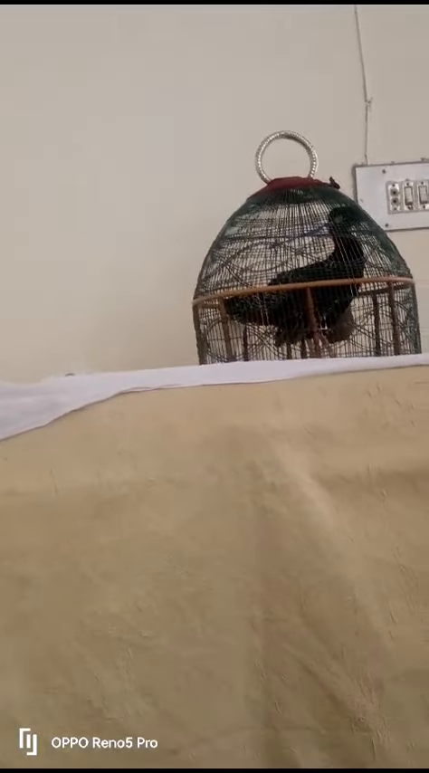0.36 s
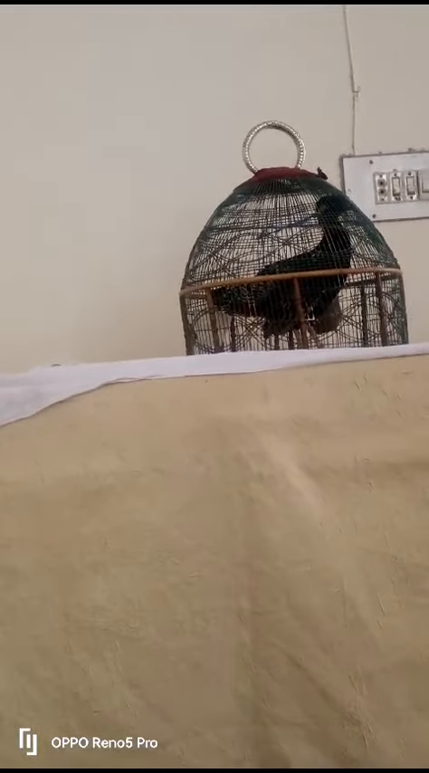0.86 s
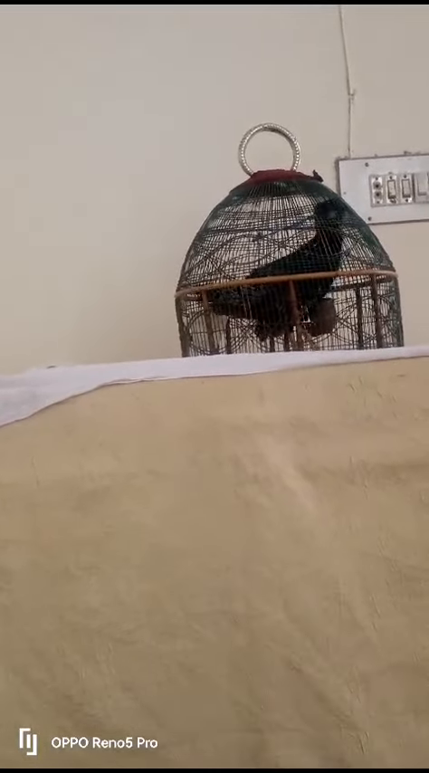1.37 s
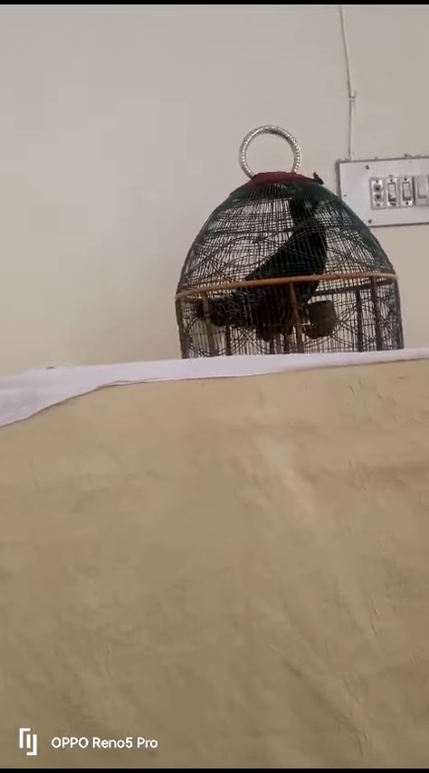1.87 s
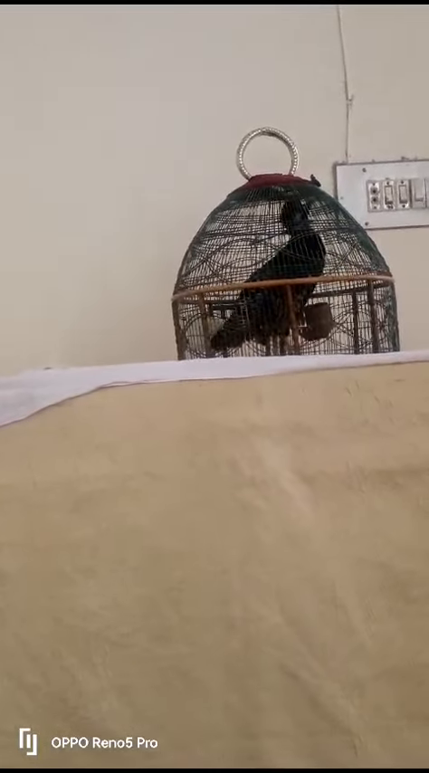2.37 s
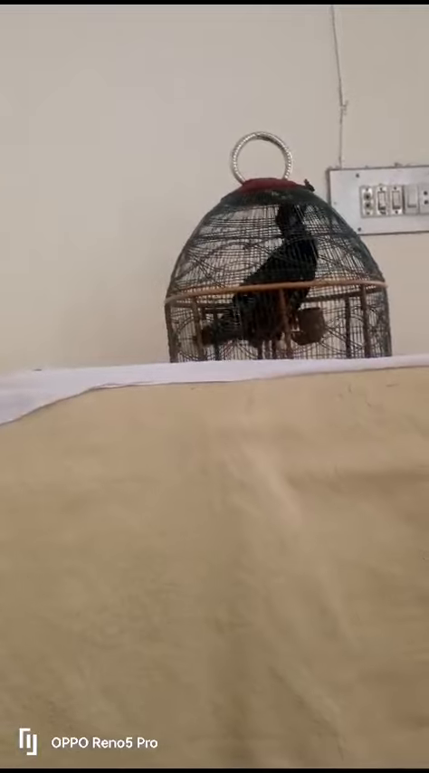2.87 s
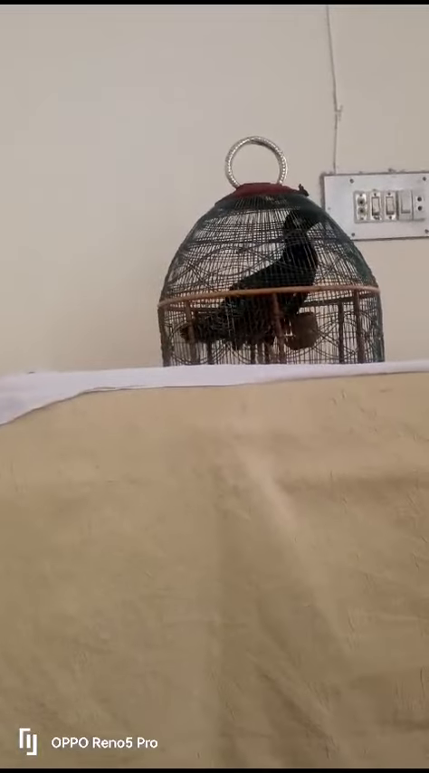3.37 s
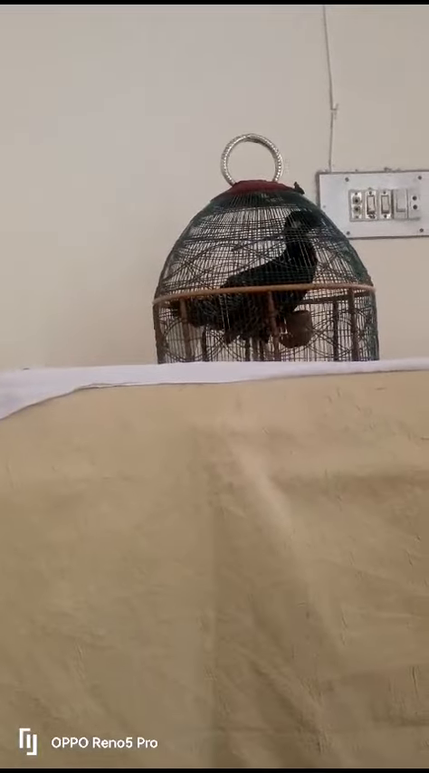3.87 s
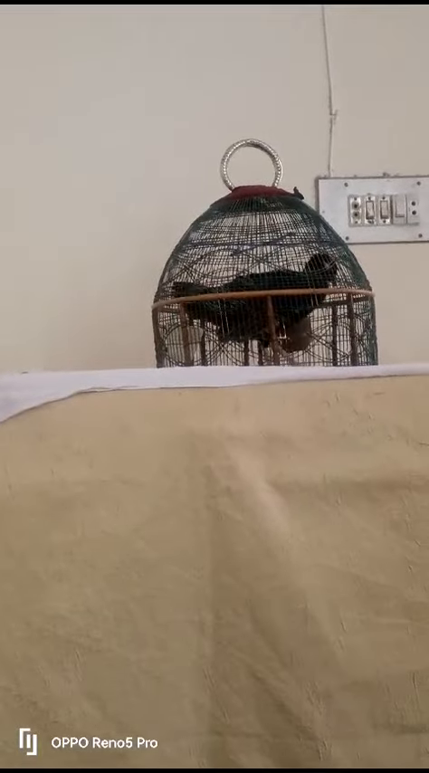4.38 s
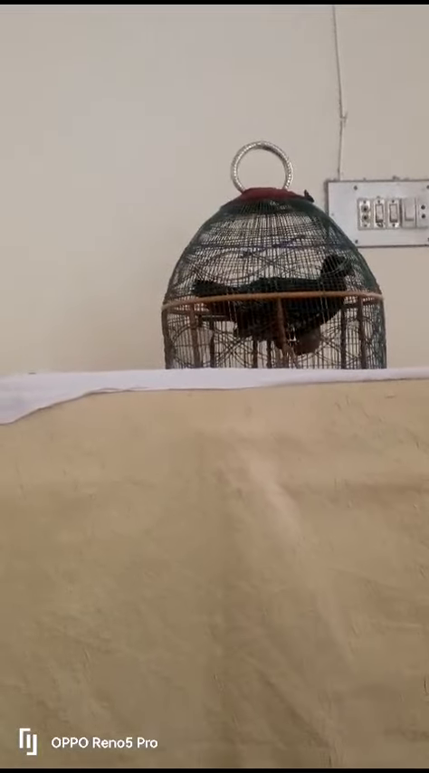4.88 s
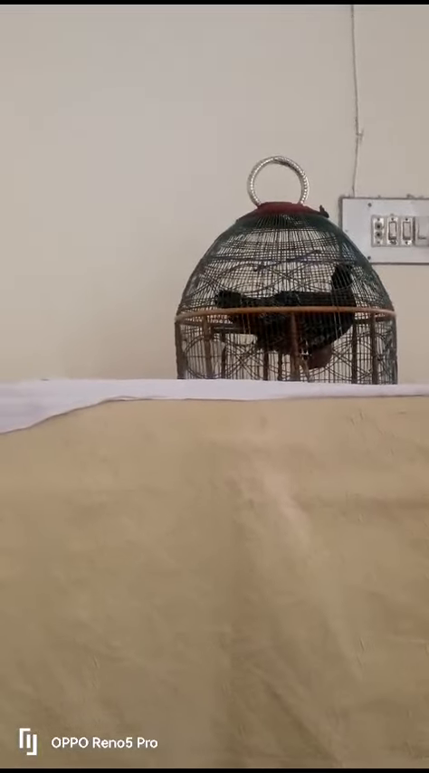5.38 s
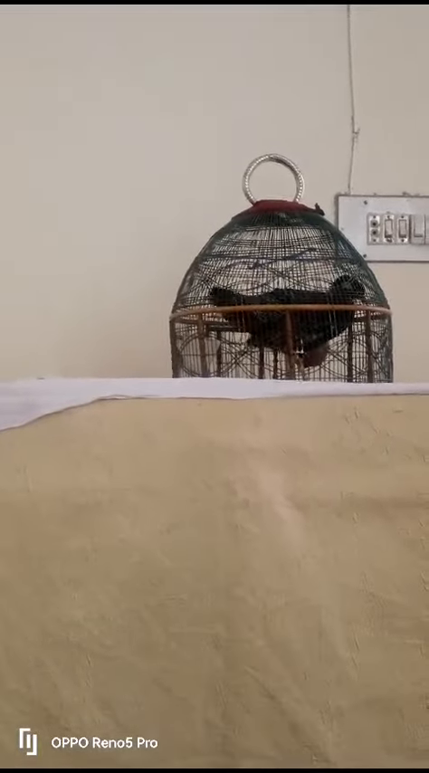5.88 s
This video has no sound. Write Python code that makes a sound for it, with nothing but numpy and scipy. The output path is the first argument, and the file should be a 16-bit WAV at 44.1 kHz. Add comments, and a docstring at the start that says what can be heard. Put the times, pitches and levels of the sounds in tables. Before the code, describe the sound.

A caged game bird gives five harsh, raspy, piercing calls in a bare room while a ceiling fan hums, ticks and squeaks.

```python
"""A ceiling fan hums and rustles in a bare room, ticks and squeaks; then a caged game bird gives five harsh calls.
Air and draught are shaped noise; ticks are dying noise bursts and squeaks are sagging rough tones.
The bird is a source-filter voice: uneven pulses and breath excite moving resonances.
A phone hears it with two unlike microphones: a dull left one and a shrill right one that overloads."""
import sys
import numpy as np
from scipy import signal
from scipy.fft import rfft, irfft, next_fast_len
from scipy.io import wavfile
from scipy.ndimage import uniform_filter1d, minimum_filter1d

SR = 44100
rng = np.random.default_rng(int(sys.argv[2]) if len(sys.argv) > 2 else 0)


def int16_out(signal):
    """Quantize to a 16-bit WAV file."""
    q = np.round(np.clip(np.atleast_2d(signal).T, -1, 1) * 32767)
    wavfile.write(sys.argv[1], SR, q.astype(np.int16))


def attenuation_scalar(level_db):
    """Turn a level in dB into a linear amplitude multiplier (20 dB per decade)."""
    decades = np.asarray(level_db, float) / 20
    return 10 ** decades


N = 265030
RIGHT_LAG = 14   # samples by which sound reaches the right microphone later


def times():
    """Sampling: the instant of every sample in seconds."""
    return np.arange(N) / SR


def rms_one(x):
    """Normalisation: equal mean power, here an rms of 1 over all channels."""
    return x / np.sqrt(np.mean(x ** 2) + 1e-20)


def at_bins(points, size):
    """Interpolation on a logarithmic frequency axis: a (Hz, value) table read at every FFT bin."""
    hz, value = np.transpose(points)
    bin_hz = np.arange(size // 2 + 1) * SR / size
    return np.interp(np.log(bin_hz + 1), np.log(hz), value)


def colour(x, points):
    """Linear filtering: each frequency is scaled by a (Hz, dB) table, its phase left alone."""
    size = next_fast_len(N)
    spectrum = rfft(x, size) * attenuation_scalar(at_bins(points, size))
    return irfft(spectrum, size)[..., :N]


def drift(rate_hz, channels=1):
    """Low-passed random fluctuation: white noise through two equal poles, rms 1."""
    pole = np.exp(-2 * np.pi * rate_hz / SR)
    noise = rng.standard_normal((channels, N + SR))
    slow = signal.lfilter([1], [1, -2 * pole, pole * pole], noise)
    return rms_one(slow[:, SR:])   # the first second lets the filter settle


def resonate(x, hz, width_hz):
    """Heterodyne resonance: shift a movable centre to 0 Hz, low-pass twice, shift back; rms 1."""
    turn = np.exp(2j * np.pi * np.cumsum(hz + np.zeros(N)) / SR)
    pole = np.exp(-np.pi * width_hz / SR)
    envelope = signal.lfilter([1], [1, -2 * pole, pole * pole], x / turn)
    return rms_one(np.real(turn * envelope))


def fan_air():
    """Turbulence noise and motor hum throbbing once a turn; the two ears' coherence falls with frequency."""
    # Air moved by the blades. Each row: frequency in Hz, density in dB per Hz before slow fluctuation.
    air_spectrum = [(25, -71), (90, -67), (250, -69), (520, -72), (1000, -74.5), (1350, -82.5), (2200, -86),
                    (4000, -84.5), (8000, -106.5), (16000, -100)]
    # Motor hum bands. Each row: centre in Hz, width in Hz, level in dB before the throb,
    # throb depth in dB either way, time of a throb peak in seconds.
    hum_bands = [(150.3, 57, -49, 6.5, 0.08), (412, 64, -52.5, 3, 0.11)]
    # Likeness of the two ears. Each row: frequency in Hz, correlation from 0 to 1.
    ear_likeness = [(60, 0.86), (240, 1), (950, 0.44), (3770, 0.01), (15000, 0.03)]
    turns_per_s = 4.5
    size = next_fast_len(N)
    alike = np.clip(at_bins(ear_likeness, size), -1, 1)
    mid, side = rfft(rng.standard_normal((2, size)))
    shared = np.sqrt((1 + alike) / 2) * mid
    opposed = np.sqrt((1 - alike) / 2) * side * [[1], [-1]]
    white = irfft(shared + opposed, size)[:, :N]
    out = colour(white, air_spectrum) * np.sqrt(SR / 2) * attenuation_scalar(1.2 * drift(6.4))
    for hz, width_hz, hum_db, throb_db, peak_s in hum_bands:
        throb = throb_db * np.cos(2 * np.pi * turns_per_s * (times() - peak_s))
        out += attenuation_scalar(hum_db + throb) * resonate(white, hz, width_hz)
    return out


def draught():
    """Flow noise at the ports: lumpy rumble in gusts, partly its own at each port, stronger on the right."""
    # Gusts on the microphone ports. Each row: time of the peak in seconds,
    # level in dB before the port offsets, slope up and down in dB per second.
    port_gusts = [(.5, -47, 64), (.95, -50, 88), (1.27, -39, 111), (1.68, -40.5, 92), (2.13, -48.5, 85),
                  (2.73, -36, 82), (3.25, -28, 91), (4.8, -40.5, 49), (5.52, -40, 106)]
    calm_db = -61   # before the port offsets
    noise = rng.standard_normal((2, N)) + 1.64 * rng.standard_normal(N)   # own + common
    rumble = rms_one(colour(noise, [(12, -25), (28, 1), (70, -10.0), (160, -19.0), (500, -18),
                                    (1300, -31.0), (16000, -120)]))
    strength = attenuation_scalar(calm_db)
    for s, peak_db, slope in port_gusts:
        strength = strength + attenuation_scalar(peak_db - slope * np.abs(times() - s))
    port_db = [[-2.0], [2.5]]   # left, right
    return rumble * strength * attenuation_scalar(2.1 * drift(6.7, channels=2) + port_db)


def fan_ticks():
    """Impact excitation: loose parts rattle in short bright noise bursts that decay exponentially."""
    # Loud ticks. Each row: time in seconds, strength in dB before smearing and colouring.
    loud_ticks = [(0.2049, -49), (0.3466, -49), (0.511, -52), (0.7552, -51), (0.9253, -44.5), (1.1687, -54),
                  (1.2216, -49), (3.7962, -48.5), (3.9987, -47), (4.1843, -50), (4.313, -47), (4.509, -44),
                  (4.7086, -45.5), (4.7984, -51), (5.0933, -44.5), (5.1911, -46), (5.3102, -45.5),
                  (5.49, -50), (5.6634, -53), (5.9637, -53)]
    # faint ticks at random: rate, then median and spread of strength before smearing and colouring
    faint_per_s, faint_db, faint_spread_db = 3, -57, 3
    struck = rng.random(N) < faint_per_s / SR
    knocks = struck * attenuation_scalar(faint_db + faint_spread_db * rng.standard_normal(N))
    for s, tick_db in loud_ticks:
        knocks[round(s * SR)] = attenuation_scalar(tick_db)
    decay_s = 0.012
    shape = signal.lfilter([1], [1, -np.exp(-1 / (decay_s * SR))], knocks + 1e-18)
    shape = uniform_filter1d(shape, size=260)   # a few parts strike within 6 ms
    noise = rng.standard_normal(N)
    return shape * colour(noise, [(1500, -30.0), (3000, 9.5), (6000, 4.5), (16000, -15)])


def fan_squeaks():
    """Frictional oscillation: a dry bearing sings briefly in phase-roughened tones that sag in pitch."""
    # Squeaks. Each row: start in seconds, peak level in dB at the source, starting pitch in Hz,
    # time to the final fade in seconds.
    bearing_squeaks = [(0.94, -49, 3500, 0.037), (1.41, -53.5, 5790, 0.016), (4.503, -51, 5540, 0.021),
                       (4.812, -34.5, 4340, 0.034), (4.906, -49.5, 3500, 0.043), (4.906, -45, 6970, 0.011),
                       (4.992, -40.5, 7420, 0.02), (5.103, -28.5, 4260, 0.032), (5.307, -48.5, 6320, 0.015),
                       (5.476, -48.5, 3340, 0.039)]
    out = np.zeros(N)
    wobble = .5 * drift(140)[0]   # radians
    for s, squeak_db, hz, length in bearing_squeaks:
        shape = np.interp(times(), [s, s + .004, s + length, s + length + .01], [0, 1, .6, 0])
        age = times() - s
        phase = 2 * np.pi * hz * age * (1 - 0.31 * age)
        out += attenuation_scalar(squeak_db) * shape * np.sin(phase + wobble)
    return out


def bird():
    """Source-filter voice: syrinx pulses and breath gated by them excite moving bands; the beak adds overtones."""
    # Effort of the calls. Each row: start in seconds, length in seconds, level in dB,
    # seconds until the high band is full, fade of the middle band over the call in dB.
    call_effort = [(1.512, .09, -5, 0.041, 18.5), (1.966, .2, -5.5, .04, 12), (2.309, 0.24, -5, 0.027, 10),
                   (2.816, 0.11, -4.5, 0.036, 10), (2.982, 0.16, -6, 0.061, 5)]
    # Colour of the same calls. Each row: low band in Hz, high band in Hz at the start, and at the end,
    # opening cluck in dB, closing cluck in dB, overtone gain in dB.
    call_colour = [(3018, 6150, 5850, -63, -29, -17.5), (3237, 5440, 5650, -22, -51, -26.5),
                   (3150, 5320, 5170, -26.5, -43.5, -28.5), (3110, 5470, 5360, -26.5, -44, -25),
                   (3127, 5250, 5440, -30.5, -42, -27.5)]
    # Low, middle and high band. Each row: level in dB against the call, dB under that at the opening.
    voice_bands = [(-5, 25), (3, 41.5), (-4, 43)]
    pulses_per_s, pulse_jitter, breath_share = 240, .35, 0.52   # median rate, log spread, mix
    middle_ratio = 1.3125   # middle band over low band
    widths_hz = [560, 500, 380]   # low, middle, high
    low_rise_s, middle_rise_s = 0.016, .013
    low_fade_db, high_fade_db = 11.5, 14.5   # over the call
    wander = .02   # share by which the band centres waver
    surge_db, surges_per_s = 3.5, 29.4   # each band swells and sags on its own
    lowest_hz, lowest_width_hz, lowest_held_db = 1480, 520, -66
    cluck_from_hz, cluck_rise_s = 1210, 0.0046   # the lowest band slides up to its place
    cluck_sink_db_per_s, shut_swell_db_per_s = 1300, 157

    cycle = np.cumsum(pulses_per_s * np.exp(pulse_jitter * drift(90)[0])) / SR
    clicks = np.diff(np.floor(cycle), prepend=0)
    pulses = rms_one(clicks * attenuation_scalar(1.8 * rng.standard_normal(N)))
    breath = rms_one(rng.standard_normal(N) * np.exp(-1.5 * (cycle % 1)))
    source = (1 - breath_share) * pulses + breath_share * breath

    effort, tint = np.array(call_effort), np.array(call_colour)
    now = np.maximum(np.searchsorted(effort[:, 0], times()) - 1, 0)   # latest call at each sample
    s, length, call_db, high_rise_s, middle_fade_db = effort[now].T
    low_hz, start_hz, end_hz, cluck_db, shut_db, overtone_db = tint[now].T
    age = np.maximum(times() - s, 0)
    done = np.minimum(age / length, 1)

    high_hz = start_hz + (end_hz - start_hz) * done
    centres = [low_hz, middle_ratio * low_hz, high_hz]
    rises = [low_rise_s, middle_rise_s, high_rise_s]
    fades = [low_fade_db, middle_fade_db, high_fade_db]
    upper = 0
    for hz, width_hz, rise_s, fade_db, (band_db, open_db) in zip(centres, widths_hz, rises, fades, voice_bands):
        opening_db = -open_db * np.maximum(1 - age / rise_s, 0)
        level_db = call_db + band_db + opening_db - fade_db * done + surge_db * drift(surges_per_s)[0]
        centre_hz = hz * (1 + wander * drift(23.6)[0])
        upper = upper + attenuation_scalar(level_db) * resonate(source, centre_hz, width_hz)
    # the throat passes little outside its band
    throat = signal.butter(4, [2650, 6300], "band", fs=SR, output="sos")
    upper = signal.sosfilt(throat, upper)
    # squaring makes sum frequencies; the high-pass keeps only those
    beak = signal.butter(6, 6800, "high", fs=SR, output="sos")
    overtones = signal.sosfilt(beak, attenuation_scalar(overtone_db) * upper ** 2)

    # the lowest band clucks as the voice opens, sinks, and swells again as it shuts
    opening = attenuation_scalar(cluck_db - cluck_sink_db_per_s * np.abs(age - cluck_rise_s))
    shutting = attenuation_scalar(shut_db - shut_swell_db_per_s * (1 - done) * length)
    lowest_gain = opening + attenuation_scalar(lowest_held_db) + shutting
    slide_hz = np.interp(age, [0, 2 * cluck_rise_s], [cluck_from_hz, lowest_hz])
    lowest = lowest_gain * resonate(source, slide_hz, lowest_width_hz)
    lowest = signal.sosfilt(signal.butter(4, 1000, "high", fs=SR, output="sos"), lowest)

    # the voice opens over 3 ms and shuts over 18 ms
    sounding = np.clip(np.minimum(age / .003, 1 - (age - length) / .018), 0, 1)
    return (upper + overtones + lowest) * sounding


def room(x, direct_db, walls_db):
    """Reverberation: direct sound, then a dense decaying tail of its own at each microphone, treble sooner."""
    room_t60_s, treble_t60_s = 0.32, 0.27   # seconds to fall by 60 dB
    t = np.arange(SR // 2) / SR
    noise = rng.standard_normal((2, len(t)))
    treble = signal.sosfiltfilt(signal.butter(3, 7000, "high", fs=SR, output="sos"), noise)
    tail = (noise - treble) * attenuation_scalar(-60 * t / room_t60_s) + treble * attenuation_scalar(-60 * t / treble_t60_s)
    tail = tail * np.clip(t / 0.0028 - 1, 0, 1)   # silent for 2.8 ms, full after 5.6 ms
    response = attenuation_scalar(walls_db) * tail / np.sqrt(np.sum(tail ** 2, axis=1, keepdims=True))
    response[[0, 1], [0, RIGHT_LAG]] = attenuation_scalar(direct_db)
    return signal.fftconvolve(x[None], response, axes=1)[:, :N]


def scene():
    """Superposition: fan air, later at the right port, draught, and fan noises and bird through the room."""
    air = fan_air()
    air[1] = np.roll(air[1], RIGHT_LAG)
    rattle = room(fan_ticks() + fan_squeaks(), direct_db=2.0, walls_db=-2.5)
    calls = room(bird(), direct_db=-1.0, walls_db=8.0)
    return air + draught() + rattle + calls


def overload(x):
    """Level-dependent noise: above its limit the converter turns unstable and adds grainy broad noise."""
    # Colour of the overload noise. Each row: frequency in Hz, gain in dB.
    crackle_colour = [(60, 4), (500, 4), (5000, 6), (7000, -3.5), (9000, -14.5), (12000, -23.5),
                      (16000, -27.5)]
    onset_db, knee_db = -5, 10
    crackle_db = -4   # noise against the signal, before the colour
    level_db = 10 * np.log10(np.maximum(uniform_filter1d(x ** 2, size=200), 1e-12))
    unstable = np.clip((level_db - onset_db) / knee_db, 0, 1)
    grains = rms_one(rng.standard_normal(N) * attenuation_scalar(1.3 * drift(210)[0]))
    return x + colour(unstable * attenuation_scalar(level_db + crackle_db) * grains, crackle_colour)


def gain_control(x, ceiling_db, release_db_per_s, size):
    """Peak compression: each side is held to a ceiling, looking ahead by some samples, with steady recovery."""
    level = 20 * np.log10(np.abs(x) + 1e-9)
    slope = release_db_per_s * times()
    held_peak = np.maximum.accumulate(level + slope, axis=1) - slope
    cut = np.minimum(ceiling_db - held_peak, 0)
    early_cut = minimum_filter1d(cut, size=size, axis=1)
    return x * attenuation_scalar(uniform_filter1d(early_cut, size=size, axis=1))


def low_pass(x):
    """Removes everything above the highest recorded frequency."""
    return signal.sosfilt(signal.butter(12, 16320, fs=SR, output="sos"), x)


def record(dry):
    """Transduction: port colour, overload on the right, slow gain control, then a quick limiter."""
    # Microphone responses. Each row: frequency in Hz, gain in dB.
    left_response = [(2200, -3), (3400, -10.5), (4200, -18.5), (5000, -13.5), (5700, -28.5), (6150, -37.5),
                     (7200, -26.5), (12000, -15.5), (15500, -13)]
    right_response = [(2200, -2.5), (3400, 1.5), (4000, -8.5), (5400, 12), (6200, 10), (7200, -9.5),
                      (8000, -18), (9000, -35), (11000, -14), (15500, -14)]
    left = colour(dry[0], left_response)
    right = overload(colour(dry[1], right_response))
    mix = gain_control(np.array([left, right]), ceiling_db=9.0, release_db_per_s=45, size=150)
    mix = gain_control(mix, ceiling_db=-1.3, release_db_per_s=900, size=90)
    return low_pass(mix)


dry = scene()
out = record(dry)
int16_out(out)
```